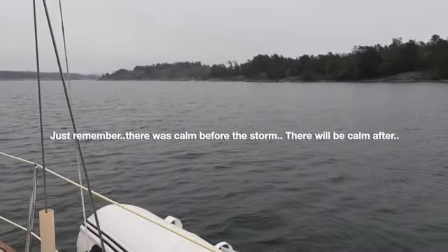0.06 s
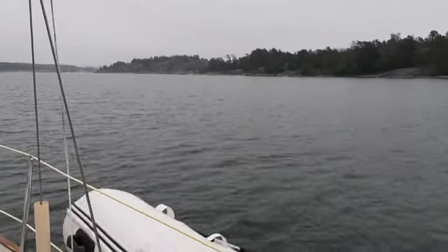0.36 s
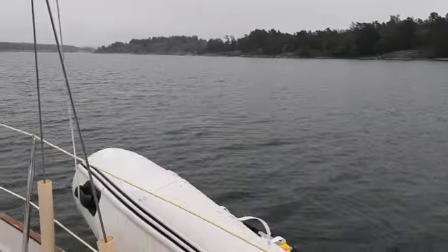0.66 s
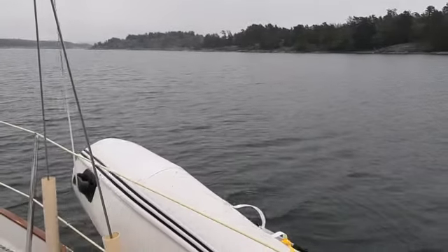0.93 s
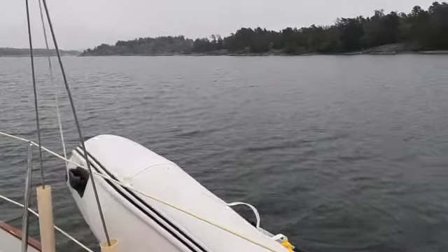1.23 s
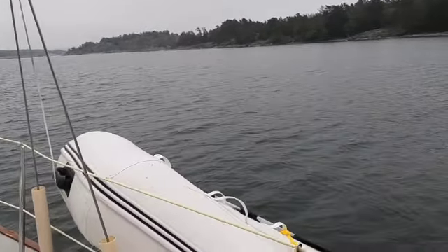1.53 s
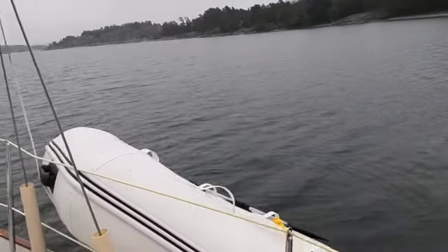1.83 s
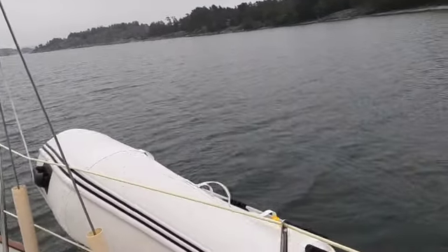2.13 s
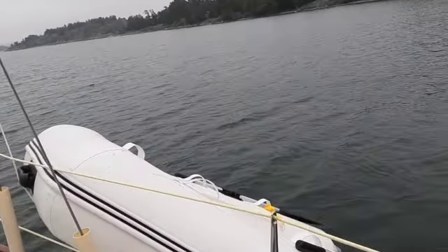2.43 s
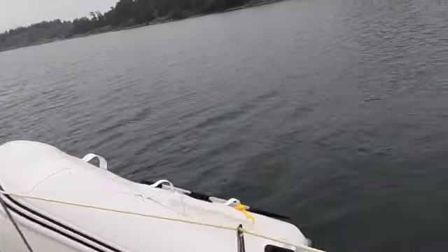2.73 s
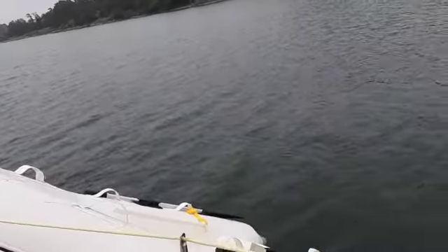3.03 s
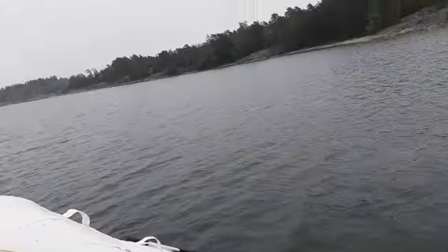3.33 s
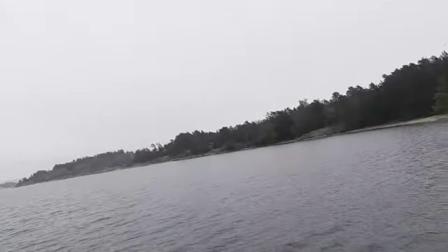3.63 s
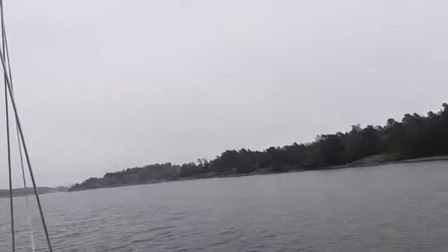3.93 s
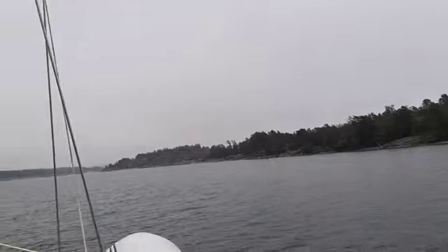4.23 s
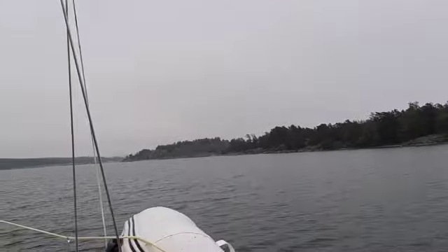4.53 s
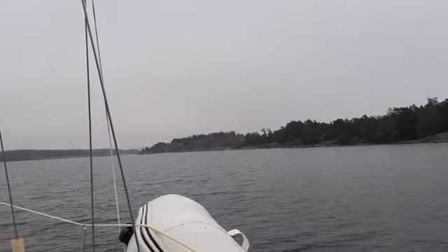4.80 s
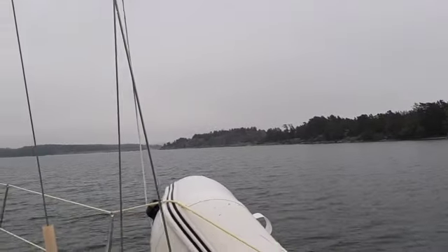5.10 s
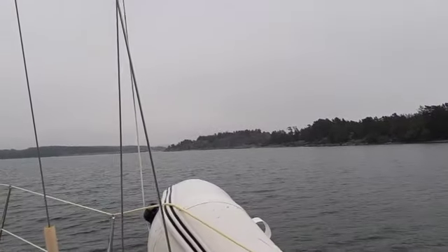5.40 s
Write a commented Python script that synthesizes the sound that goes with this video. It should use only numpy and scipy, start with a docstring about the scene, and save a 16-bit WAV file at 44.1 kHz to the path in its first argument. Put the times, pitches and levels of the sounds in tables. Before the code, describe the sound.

On a sailboat's open deck, an inflatable dinghy rubs against its lines, close and slightly left of the microphone. Dry snaps crowd into rough creaks, with one brief squeak near two seconds. The rubber rests for about a second, then creaks almost continuously to the end. Low wind gusts rumble and thump on the microphone, while ripples hiss faintly and water gurgles softly against the hull.

```python
"""Dinghy creaking at the rail

On the deck of a rocking sailboat, close to an inflatable dinghy that shifts against its lines.
The rubber sticks and slips: dry snaps crowd into rough creaks, boom in the air tube and now and then
end in a squeak. Tube and line tap the rail. Gusts rumble and buffet on the stereo microphone's two
ports; behind them, ripples hiss faintly and water gurgles against the hull."""
import sys
import numpy as np
from scipy import signal
from scipy.fft import rfft, irfft
from scipy.io import wavfile
from scipy.ndimage import uniform_filter1d

SR = 44100
rng = np.random.default_rng(int(sys.argv[2]) if len(sys.argv) > 2 else 0)


def store_pcm(level_fs):
    """Save levels as 16-bit WAV."""
    pcm = np.round(np.clip(level_fs, -1, 1) * 32767).astype(np.int16)
    wavfile.write(sys.argv[1], SR, np.atleast_2d(pcm).T)


N = 249606
TIME = np.arange(N) / SR
PORT_LAG_S = .00042  # the dinghy lies to the left, so the left port hears it first
TOP_HZ = 16600


def gain_of(db):
    """Decibels to a factor."""
    return 10 ** (np.asarray(db) / 20)


def unit_rms(x):
    """Scales to rms 1."""
    return x / np.sqrt(np.mean(x ** 2) + 1e-20)


def curve_db(points, hz):
    """Reads a spectrum on a log-frequency axis."""
    f, db = np.transpose(points)
    return np.interp(np.log(hz + 1), np.log(f + 1), db)


def band_db(hz, lo, hi):
    """Steep skirts around a pass band."""
    return -10 * np.log10((1 + (lo / (hz + 1)) ** 12) * (1 + (hz / hi) ** 12))


def resonance(hz, centre_hz, width_hz):
    """A resonant peak, 1 at its centre."""
    return 1 / (1 + (2 * (hz - centre_hz) / width_hz) ** 2)


def coloured(x, db_at):
    """Filters x by a dB function of frequency; rms 1."""
    size = x.shape[-1]
    response = gain_of(db_at(np.fft.rfftfreq(size, 1 / SR)))
    return unit_rms(irfft(rfft(x) * response, size))


def banded(x, colour, lo, hi):
    """Gives x a colour between lo and hi Hz; rms 1."""
    return coloured(x, lambda f: curve_db(colour, f) + band_db(f, lo, hi))


def uncombed(x, colour, lo, hi, comb_db=1):
    """Like banded, but softens the comb that the port lag makes when both ports are heard together."""
    return coloured(x, lambda f: curve_db(colour, f) + band_db(f, lo, hi)
                    - comb_db * np.cos(2 * np.pi * f * PORT_LAG_S))


def pan(db):
    """Gains of the two ports for a level of left over right."""
    return gain_of([[db / 2], [-db / 2]])


def port_noise(size, shared, lag_s=0):
    """Noise at the two ports; the shared part reaches the right one lag_s later."""
    left, other = rng.standard_normal((2, size))
    right = shared * np.roll(left, round(lag_s * SR)) + np.sqrt(1 - shared ** 2) * other
    return np.array([left, right])


def flutter(size, rate_hz):
    """A random wobble up to rate_hz; rms 1."""
    return coloured(rng.standard_normal(size), lambda f: band_db(f, 0, rate_hz))


def lumps(size, depth_db, rate_hz):
    """A gain that wobbles by depth_db rms."""
    return gain_of(depth_db * flutter(size, rate_hz))


def swells(rows, fall_over_rise, rest_db=-np.inf):
    """A gain curve: rounded swells from rows (t/s, level/dB, rise/s) over a steady level."""
    power = gain_of(rest_db) ** 2
    for s, db, rise_s in rows:
        width_s = rise_s * np.where(TIME < s, 1, fall_over_rise)
        power = power + gain_of(db) ** 2 * np.exp(-((TIME - s) / width_s) ** 2)
    return np.sqrt(power)


def add(mix, s, sound):
    """Mixes a sound in at time s."""
    part = mix[:, max(round(s * SR), 0):][:, :sound.shape[-1]]
    part += sound[..., :part.shape[-1]]


# hiss of the water around the boat: f/Hz, level/dB
RIPPLE_COLOUR = [(900, -2), (1700, -8), (3800, -12.5), (4500, -13.5), (6000, -12.5), (7500, -9),
                 (12000, -17.5), (16000, -18)]
# small waves passing: t/s, relative level/dB, rise/s, bubble f/Hz
SMALL_WAVES = [(1.65, -53, 0.19, 3900), (2.791, -52, 0.12, 3520), (2.99, -53.5, 0.032, 2400),
               (3.22, -55, 0.14, 4170)]
def ripples(bubble_lift_db=8):
    """Fine hiss from over the side; each wave fizzes around the pitch of its own bubbles."""
    waves = 0
    for s, db, rise_s, bubble_hz in SMALL_WAVES:
        fizz = coloured(port_noise(N, 0), lambda f: curve_db(RIPPLE_COLOUR, f) + band_db(f, 600, TOP_HZ)
                        + bubble_lift_db * resonance(f, bubble_hz, width_hz=710))
        waves = waves + fizz * swells([(s, db, rise_s)], fall_over_rise=0.96)
    calm = gain_of(-72.5) * banded(port_noise(N, 0), RIPPLE_COLOUR, 650, TOP_HZ)
    sparkle = unit_rms(lumps(N, depth_db=1.5, rate_hz=83))
    return (calm + gain_of(-9.5) * waves) * sparkle


# sloshes against the hull: t/s, level/dB, rise/s
SLOSHES = [(3.56, -59, 0.044), (4.89, -48.5, 0.063), (5.13, -45.5, 0.06), (5.56, -50.5, .09)]
# modes of the hollow under the hull: f/Hz, level/dB
HOLLOW, HOLLOW_WIDTH_HZ = [(335, -3), (408, -3.5), (500, -3)], 39
def gurgles():
    """Below deck level, a little to the right, water sloshes into the hollow, which rings."""
    def hollow_db(f):
        return 20 * np.log10(sum(gain_of(db) * resonance(f, hz, HOLLOW_WIDTH_HZ) for hz, db in HOLLOW))

    slosh = port_noise(N, 0.6) * lumps(N, depth_db=4, rate_hz=60)
    return coloured(slosh, hollow_db) * swells(SLOSHES, fall_over_rise=0.81) * pan(-3.5)


# rumble of the wind: f/Hz, level/dB
WIND_COLOUR = [(55, -2.5), (93, 4.5), (204, -1), (358, -7), (398, -25), (483, -19.5), (700, -27.5),
               (910, -65)]
# gusts: t/s, relative level/dB, rise/s
WIND_GUSTS = [(.1, -49.5, 0.044), (.53, -54.5, 0.029), (1.05, -43.5, 0.1), (1.76, -48.5, 0.017),
              (2.3, -44, 0.09), (2.95, -51, 0.058), (3.62, -51.5, 0.15), (4.12, -48.5, 0.051),
              (4.42, -44.5, 0.024)]
def wind():
    """Lumpy low turbulence right on the microphone, partly shared by the ports."""
    rumble = banded(port_noise(N, 0.53), WIND_COLOUR, 44.6, 990)
    turbulence = unit_rms(rumble * lumps(N, depth_db=3, rate_hz=36.5))
    return turbulence * swells(WIND_GUSTS, fall_over_rise=2.8, rest_db=-56) * gain_of(4)


# eddies: t/s, relative level/dB, upper edge f/Hz, half-width/s, left over right/dB
EDDIES = [(0.122, -35.5, 266, 0.0045, -17), (0.197, -30, 272, 0.0048, -7), (0.436, -28.5, 610, 0.0093, 4.5),
          (1.002, -21, 270, 0.0022, -9), (1.037, -26, 304, 0.013, -19), (1.213, -32, 490, 0.0089, -23),
          (1.475, -30.5, 484, 0.012, -6.5), (1.787, -39, 253, 0.0057, -30), (2.065, -39, 183, 0.0091, 30.5),
          (2.238, -29.5, 200, 0.012, 25.5), (2.283, -31, 533, 0.0039, 30), (2.408, -31, 230, 0.019, -25),
          (2.404, -34, 680, 0.0033, -23.5), (2.429, -36.5, 645, 0.0013, -28), (2.433, -31, 110, 0.012, 9),
          (2.55, -29.5, 338, 0.0091, -5), (3.469, -31.5, 455, 0.023, 0.5), (3.613, -31, 270, 0.0011, 18)]
def buffets():
    """Single eddies strike the microphone's ports with a dull thud."""
    out, t = np.zeros((2, N)), np.arange(2 ** 13) / SR
    for s, db, edge_hz, width_s, side_db in EDDIES:
        swell = np.exp(-((t - t.mean()) / width_s) ** 2 / 2)
        eddy = swell * coloured(port_noise(len(t), 0.38),
                                lambda f: band_db(f, edge_hz / 4.1, edge_hz) - 3 * np.log2(1 + f / 200))
        eddy /= np.sqrt((eddy ** 2).sum(1, keepdims=True) / (swell ** 2).sum())  # equal energy per port
        add(out, s - t.mean(), gain_of(db - 7) * pan(side_db) * eddy)
    return out


# taps of the line: t/s, level/dB
LINE_TAPS = [(5.566, -42.5), (5.587, -41), (5.628, -48.5)]
# modes of the rail: f/Hz, level/dB, t60/s
RAIL_MODES = [(750, 8, 0.059), (907, 12, 0.039), (1022, 2, 0.061)]
def line_taps(rise_s=0.0034):
    """The line taps the rail, which rings briefly."""
    out, t = np.zeros((2, N)), np.arange(SR // 8) / SR
    for s, db in LINE_TAPS:
        ring = sum(gain_of(mode_db - 60 * t / t60) * np.sin(2 * np.pi * (hz * t + rng.random((2, 1))))
                   for hz, mode_db, t60 in RAIL_MODES)
        add(out, s, gain_of(db) * ring * (1 - np.exp(-t / rise_s)))
    return out


# bumps of the tube: t/s, level/dB
TUBE_BUMPS = [(1.461, -44.5), (3.450, -44.5)]
def tube_bumps():
    """The soft tube bumps the rail, which stirs only the low ring of its skin."""
    out = np.zeros((2, N))
    for s, db in TUBE_BUMPS:
        ring = snap(port_noise(2 ** 13, 0.55), PULLING, (700, 1900),
                    rise_s=.002, t60=0.091, tail_db=-12, tail_t60=0.29)
        add(out, s, gain_of(db) * ring)
    return out


def aftermath(times, dbs, t60, stop_s=np.inf, rise_s=0.0039):
    """A gain curve: every slip adds energy, which dies away and is cut short after stop_s."""
    power, t = np.zeros((1, N)), np.arange(SR) / SR
    decay = (1 - np.exp(-t / rise_s)) * gain_of(-60 * t / t60)
    tail = decay ** 2 * np.exp(-(t / stop_s) ** 4)
    for s, db in zip(times, dbs):
        add(power, s, gain_of(db) ** 2 * tail)
    return np.sqrt(power[0])


# hum of the air tube: f/Hz, level/dB
TUBE_COLOUR = [(150, -8), (260, 3), (390, 7), (500, -2), (600, -15.5), (1000, -18)]
def tube_boom(events, rest_db=-57.5):
    """The air tube hums low, right of centre, swelling just after each slip."""
    s, db, *_ = events.T
    boom_db = np.array(DINGHY_STROKES)[stroke_at(s), 5]
    swell = np.hypot(aftermath(s, db + boom_db, t60=0.3), gain_of(rest_db))
    hum = banded(port_noise(N, 0.61), TUBE_COLOUR, 150, 970)
    return hum * swell * pan(-4.5)


def scrape(events, ticks_per_s=51, tick_s=.002, tick_db=-4, regrip_s=0.1):
    """After each slip the rubber slides on, grainy and with tiny catches, until it grips again."""
    catches = rng.uniform(0, 1, N) * (rng.random(N) < ticks_per_s / SR)
    ticks = signal.lfilter([1], [1, -np.exp(-1 / (tick_s * SR))], catches)
    grains = port_noise(N, 0.21, PORT_LAG_S)
    grains *= unit_rms(lumps(N, depth_db=4, rate_hz=160)) + gain_of(tick_db) * unit_rms(ticks)
    stroke = stroke_at(TIME)
    rubbing = np.hstack([uncombed(grains[:, stroke == i], colour, 690, TOP_HZ)
                         for i, colour in enumerate(STROKE_COLOURS)])
    s, db, *_ = events.T
    scrape_db = np.array(DINGHY_STROKES)[stroke_at(s), 4]
    return rubbing * aftermath(s, db + scrape_db, t60=0.58, stop_s=regrip_s) * pan(2.5)


# squeaks: t/s, length/s, first f/Hz, last f/Hz, level/dB, settling point/share, its half-width/share
RUBBER_SQUEAKS = [(1.808, 0.094, 3180, 2460, -40, 0.69, 0.098), (3.338, 0.06, 5600, 4220, -73, .45, 0.44)]
def squeaks(jitter_share=0.098, rasp_db=-10.5):
    """Slips merge into a raspy squeal with side tones, swelling to one clear pitch as the grip settles."""
    out = np.zeros((2, N))
    for s, length_s, first_hz, last_hz, db, settle_at, settle_width in RUBBER_SQUEAKS:
        size = round(length_s * SR)
        along = np.linspace(0, 1, size)
        settled = np.exp(-((along - settle_at) / settle_width) ** 2)
        hz = first_hz + (last_hz - first_hz) * along
        hz *= 1 + jitter_share * (1 - settled) * flutter(size, 1300)
        phase = 2 * np.pi * np.cumsum(hz) / SR
        tone = np.sin(phase)
        side_tones = (1 - settled) * (np.sin(.6 * phase) + .6 * np.sin(1.62 * phase))
        grit = banded(port_noise(size, 0.13, PORT_LAG_S), PULLING, 570, 14000)
        stutter = lumps(size, depth_db=1, rate_hz=170)  # the grip falters
        rasp = (tone + side_tones + 0.85 * grit) * np.sin(np.pi * along) * stutter
        squeal = np.sqrt(2) * settled * tone + gain_of(rasp_db) * rasp
        add(out, s, gain_of(db) * squeal * signal.windows.tukey(size, .15))
    return out


def crackle(size, colour, count=5, span_s=0.0326, rise_s=0.0017, spread_db=25):
    """Small patches of rubber let go around a slip, each a dry click of its own."""
    t, clicks = np.arange(size) / SR, 0
    for place, weakness in rng.random((count, 2)):
        age = np.maximum(t - place * span_s, 0) / rise_s
        clicks = clicks + gain_of(-spread_db * weakness) * age * np.exp(1 - age)
    return clicks * uncombed(port_noise(size, 0.46, PORT_LAG_S), colour, 950, TOP_HZ)


def chirp(size, hz, rise_s=0.00064, t60=0.018, jitter_share=0.024):
    """The grip shudders as it lets go, giving a short pitched ring."""
    t = np.arange(size) / SR
    unsteady_hz = hz * (1 + jitter_share * flutter(size, 730))
    turns = np.cumsum(unsteady_hz) / SR - np.array([[0], [.1]])  # the right port trails
    return (1 - np.exp(-t / rise_s)) * gain_of(1 - 60 * t / t60) * np.sin(2 * np.pi * turns)


# modes of the taut skin: f/Hz, level/dB, t60/s
SKIN_MODES = [(1056, -10.5, 0.05), (1191, -8, 0.066), (3030, -17.5, 0.093), (4260, -13, 0.033),
              (7200, -8.5, 0.033)]
def skin_ping(size, soft_db, colour, spread_db=2, rise_s=0.0013):
    """Every slip strikes the skin's modes a little differently; a soft slip favours the low ones."""
    t, out = np.arange(size) / SR, 0
    for hz, db, t60 in SKIN_MODES:
        detune = 0.01 * np.sqrt(hz / SKIN_MODES[0][0]) * rng.standard_normal()  # high modes wander more
        turns = hz * (1 + detune) * t + rng.random() - np.array([[0], [.08]])  # ports almost in phase
        strength_db = db + .5 * curve_db(colour, hz) + soft_db * (hz < 1800)
        strength_db += spread_db * rng.standard_normal()
        out = out + gain_of(strength_db - 60 * t / t60) * np.sin(2 * np.pi * turns)
    return out * (1 - np.exp(-t / rise_s))


def snap(grit, colour, band_hz, rise_s, t60, tail_db, tail_t60):
    """One band of a slip: a fast-dying snap and a weaker tail from within the tube."""
    t = np.arange(grit.shape[-1]) / SR
    decay = np.hypot(gain_of(-60 * t / t60), gain_of(tail_db - 60 * t / tail_t60))
    burst = (1 - np.exp(-t / rise_s)) * decay * uncombed(grit, colour, *band_hz)
    peak_power = uniform_filter1d((burst ** 2).mean(0), size=132).max()  # the loudest 3 ms
    return burst / np.sqrt(peak_power)


def wandered(colour, wander_db=3.5):
    """The contact point wanders, so every slip has its own ragged peaks and dips."""
    hz = np.geomspace(600, TOP_HZ, 64)
    return np.column_stack([hz, curve_db(colour, hz) + wander_db * rng.standard_normal(len(hz))])


# runs of slips: start t/s, end t/s, slip count, last rate over first, first level/dB, last level/dB,
# chirp f/Hz, last fizz level/dB
CREAK_RUNS = [(0.2, 0.355, 5, 0.98, -27, -26, 2560, -45.5), (1.7496, 1.797, 3, 1.04, -36, -36, 4530, -54.5),
              (3.069, 3.204, 9, 1.03, -48.5, -40.5, 3870, -66),
              (3.6212, 3.725, 7, 1.25, -30, -31.5, 4320, -54),
              (3.7395, 3.828, 7, 1.21, -30.5, -26, 4170, -44.5),
              (3.8523, 3.928, 6, 0.86, -29.5, -28, 4290, -43.5),
              (4.041, 4.117, 4, 1.1, -29.5, -29.5, 2465, -44),
              (4.289, 4.395, 6, 1.33, -30.5, -31, 2440, -44),
              (4.7052, 4.81, 8, 1.2, -32.5, -35, 2310, -48.5)]
def creak(start, end, count, speed_up, first_db, last_db, chirp_hz, last_fizz_db):
    """The rubber sticks and slips at a steadily changing rate; gives rows like LONE_SLIPS."""
    uneven_share, uneven_db = .02, 1.9
    gap_chance, level_chance, pitch_chance = rng.standard_normal((count, 3)).T
    gaps = speed_up ** -np.linspace(0, 1, count - 1) * (1 + uneven_share * gap_chance[1:])
    along = np.append(0, np.cumsum(gaps)) / gaps.sum()
    times = start + (end - start) * along
    db = first_db + (last_db - first_db) * along + uneven_db * level_chance
    hz = chirp_hz * (1 + uneven_share * pitch_chance)
    return list(zip(times, db, hz, last_fizz_db + db - last_db))


def stroke_at(s):
    """Which stroke of the dinghy is under way at time s."""
    return np.searchsorted([row[0] for row in DINGHY_STROKES[1:]], s)


# colour of the rubber as the line pulls, catches, presses hard and eases: f/Hz, level/dB
PULLING = [(600, -1), (748, 0), (881, -11), (1110, 5), (1450, -10), (1680, -1.5), (2150, -7.5), (2440, 1.5),
           (3120, 0), (4520, 2.5), (5480, -5.5), (7110, -4.5), (16000, -26.5)]
CATCHING = [(350, 21), (880, -9.5), (1150, 0.5), (1900, -1.5), (2600, 3), (3600, -7), (4100, 5),
            (4550, -6.5), (6100, -5), (7400, -3), (9500, -16), (16000, -32)]
PRESSING = [(600, -15), (748, 0.5), (881, -23), (1050, 2), (1220, -4), (1500, -8), (2070, -2), (2550, -5.5),
            (3340, 2), (4100, 3), (5270, -3), (7520, -7), (16000, -22)]
EASING = [(600, -2), (748, -7), (930, -18.5), (1190, -3.5), (1450, -8.5), (2240, 2.5), (3940, 5),
          (7210, 0.5), (16000, -16)]
STROKE_COLOURS = (PULLING, CATCHING, PULLING, PRESSING, PRESSING, PRESSING, EASING, EASING, EASING)
# shifts against the lines: start t/s, then level/dB re the slip of ring, ping, chirp, scrape, boom
DINGHY_STROKES = [(0, -21, -24, -9, -29.5, -24.5), (0.729, -13.5, -7, -1.5, -24, -18),
                  (1.6, -12, -11, -21, -52, -18), (2.2, -17, -16, -7, -40, -19),
                  (3.43, -18, -7, -3.5, -25, -17.5), (3.748, -17, -3, -5.5, -22.5, -23),
                  (3.95, -16, -12, -9, -28, -18.5), (4.82, -13, -11.5, -6.5, -24, -13),
                  (5.451, -12, -12, -7.5, -27.5, -14.5)]
# single slips: t/s, relative level/dB, chirp f/Hz, relative level/dB of the fizz above 7 kHz
LONE_SLIPS = [(0.051, -43, 2700, -68), (0.0848, -28, 2750, -49), (0.1574, -28, 2280, -46.5),
              (0.4006, -24.5, 2443, -40), (0.4703, -23.5, 4100, -40.5), (0.5092, -35, 4030, -48.5),
              (0.5312, -25.5, 4470, -41.5), (0.551, -33, 4360, -51), (0.5572, -30, 4500, -44.5),
              (0.5742, -22, 4380, -52), (0.59, -30, 4360, -45.5), (0.6041, -25, 4540, -42),
              (0.6247, -33.5, 4350, -50), (0.635, -38, 4360, -56), (0.688, -38, 4460, -69),
              (0.7698, -42, 4630, -57), (0.8126, -30, 4570, -40.5), (0.8762, -30, 4640, -41),
              (0.9292, -25.5, 4420, -39.5), (0.978, -26.5, 4660, -43.5), (1.045, -27.5, 4600, -42.5),
              (1.1383, -43, 2770, -68), (1.4604, -40, 2730, -53), (1.665, -27, 3850, -39),
              (1.726, -27.5, 3900, -47.5), (2.6418, -46, 2050, -65), (2.8903, -47, 2470, -56),
              (3.2398, -34, 3780, -54), (3.246, -40, 4100, -48.5), (3.2776, -34.5, 4100, -56),
              (3.3216, -34, 2170, -62), (3.448, -38.5, 2120, -90), (3.4838, -35, 4750, -56),
              (3.5096, -35.5, 3800, -57), (3.5363, -34, 3750, -55), (3.5538, -31.5, 4200, -51),
              (3.5786, -33, 4180, -51), (3.9685, -27, 4880, -40), (3.9983, -31, 2030, -47),
              (4.153, -29, 5040, -41), (4.2014, -30, 2200, -44.5), (4.238, -32, 2130, -45.5),
              (4.2697, -32.5, 2520, -46), (4.419, -28, 5560, -47.5), (4.4428, -28.5, 2400, -43.5),
              (4.4863, -31.5, 2840, -46), (4.5206, -37, 3270, -56), (4.66, -33.5, 5060, -47),
              (4.6845, -33, 2760, -48.5), (4.844, -30.5, 2350, -44.5), (4.8872, -31, 4480, -46),
              (4.9277, -31, 2270, -46.5), (5.004, -36.5, 5190, -46.5), (5.027, -32, 4300, -42.5),
              (5.067, -33.5, 2760, -46.5), (5.1048, -32.5, 2270, -45.5), (5.15, -32, 2270, -42.5),
              (5.1909, -34, 3300, -43), (5.233, -32.5, 4360, -43.5), (5.313, -33.5, 4800, -41),
              (5.3742, -31.5, 4370, -40.5), (5.4836, -32.5, 4050, -40), (5.5193, -29, 5640, -42),
              (5.562, -28.5, 5200, -38.5), (5.5834, -31.5, 4930, -42), (5.624, -30, 2740, -45)]
def rubber_slips(events, size=4096, alike_share=.62, crackle_lead_s=0.0065):
    """Dry snaps close by on the left; one stroke's slips shake the same skin and share part of their grit."""
    out = np.zeros((2, N))
    stroke_grit = [port_noise(size, 1.0, PORT_LAG_S) for _ in DINGHY_STROKES]
    for s, db, chirp_hz, fizz_db in events:
        stroke = stroke_at(s)
        _, ring_db, ping_db, chirp_db, *_ = DINGHY_STROKES[stroke]
        colour = wandered(STROKE_COLOURS[stroke])
        soft_db = -.35 * (fizz_db - db + 21)  # a slow, soft slip has little fizz and more low ring
        own_grit = port_noise(size, 0.2, PORT_LAG_S)
        jerks = lumps(size, depth_db=3.5, rate_hz=2260)  # the grip tears loose in tiny jerks
        grit = jerks * (np.sqrt(alike_share) * stroke_grit[stroke] + np.sqrt(1 - alike_share) * own_grit)
        ring = snap(grit, colour, (670, 1500), rise_s=0.0018, t60=0.11, tail_db=-14, tail_t60=0.55)
        body_t60 = 0.035 * np.exp(0.17 * rng.standard_normal())
        body = snap(grit, colour, (1650, 7000), rise_s=0.0001, t60=body_t60, tail_db=-43, tail_t60=0.49)
        spray = jerks * port_noise(size, 0.28, PORT_LAG_S)  # fizz scatters on its way to the microphone
        fizz = snap(spray, colour, (7000, TOP_HZ), rise_s=0.00063, t60=0.03, tail_db=-42, tail_t60=0.1)
        crack = gain_of(db - 9) * body + gain_of(fizz_db + 2.5) * pan(2.4) * fizz
        skin = gain_of(ring_db + soft_db) * ring + gain_of(ping_db) * skin_ping(size, soft_db, colour)
        shudder = gain_of(chirp_db) * chirp(size, chirp_hz)
        add(out, s + .0004, crack + gain_of(db) * (skin + shudder))
        add(out, s - crackle_lead_s, gain_of(db - 17) * crackle(size, wandered(colour)))
    return out * pan(2.86)


def scene():
    """The creaking dinghy in front, wind on the microphone, water behind."""
    creak_slips = [slip for run in CREAK_RUNS for slip in creak(*run)]
    events = np.array(sorted([tuple(row) for row in LONE_SLIPS] + creak_slips))
    dinghy = rubber_slips(events) + scrape(events) + squeaks() + tube_bumps() + tube_boom(events)
    return dinghy + line_taps() + wind() + buffets() + ripples() + gurgles()


def record(dry):
    """The recorder's band limit."""
    low_pass = signal.firwin(255, TOP_HZ, window=("kaiser", 8), fs=SR)
    return signal.oaconvolve(dry, low_pass[None], "same")


dry = scene()
out = record(dry)
store_pcm(out)
```